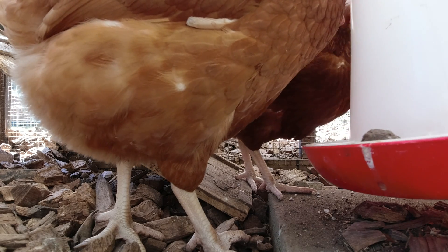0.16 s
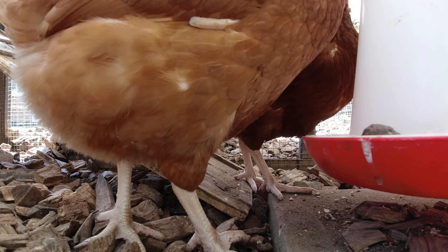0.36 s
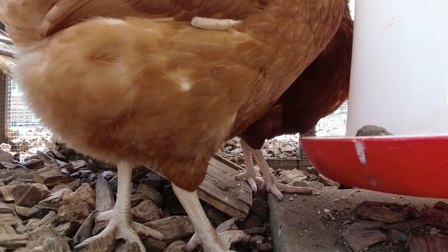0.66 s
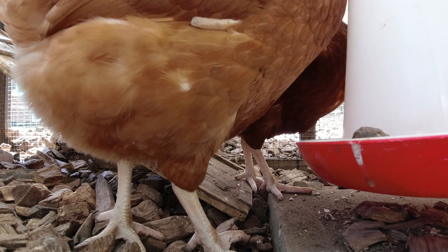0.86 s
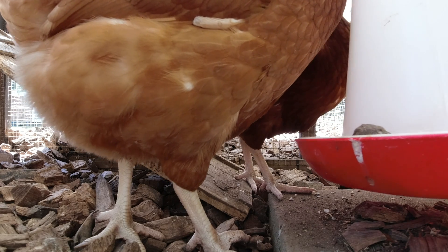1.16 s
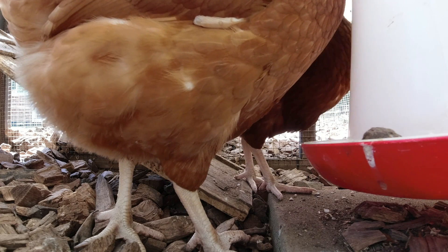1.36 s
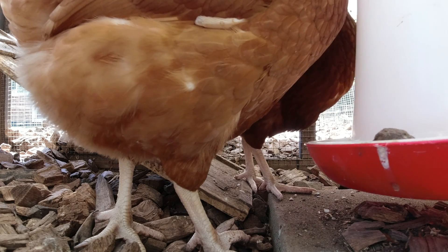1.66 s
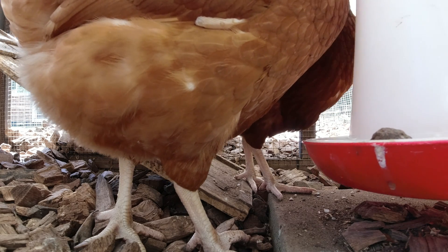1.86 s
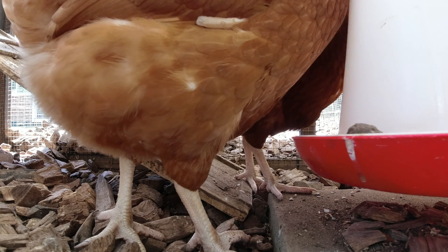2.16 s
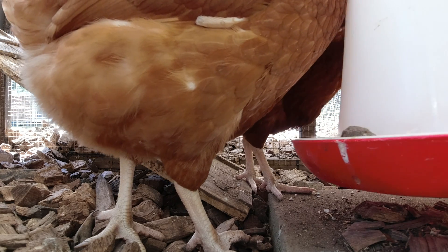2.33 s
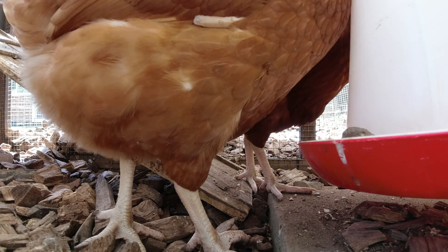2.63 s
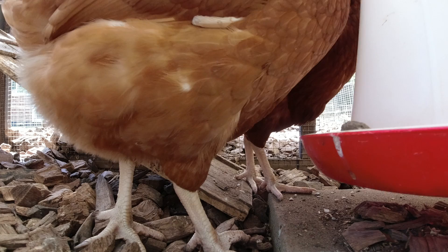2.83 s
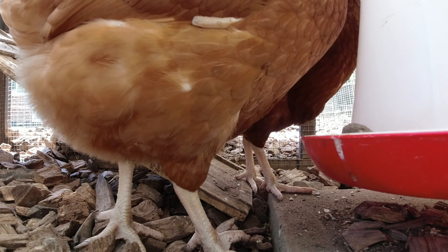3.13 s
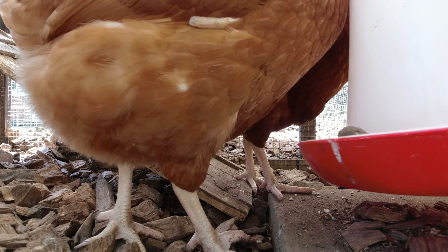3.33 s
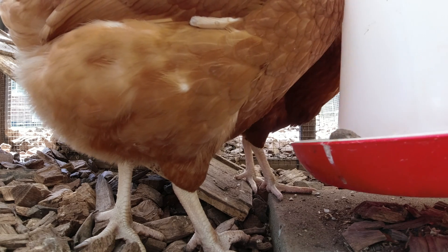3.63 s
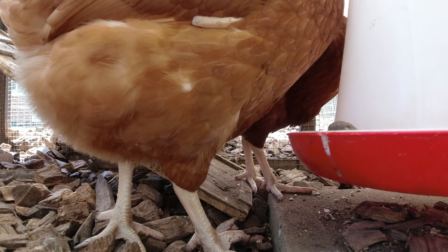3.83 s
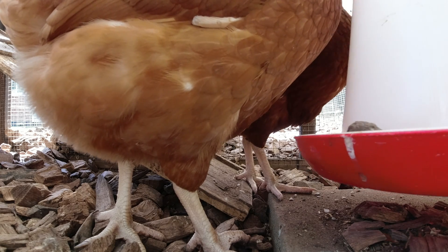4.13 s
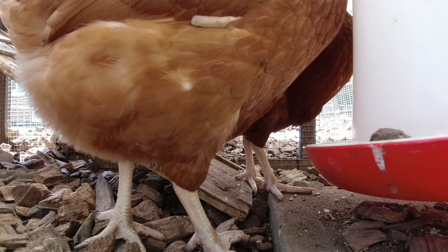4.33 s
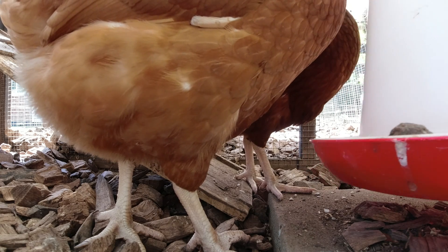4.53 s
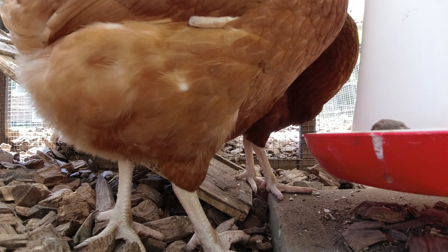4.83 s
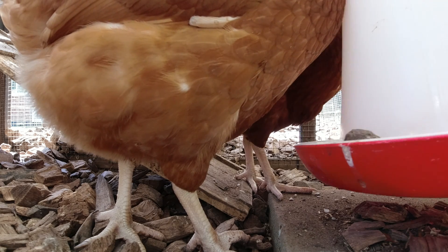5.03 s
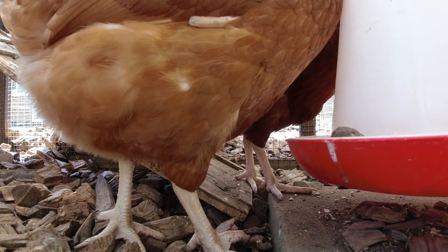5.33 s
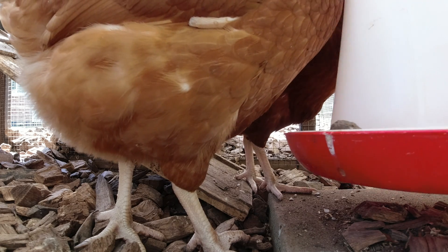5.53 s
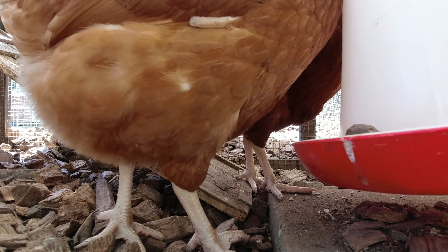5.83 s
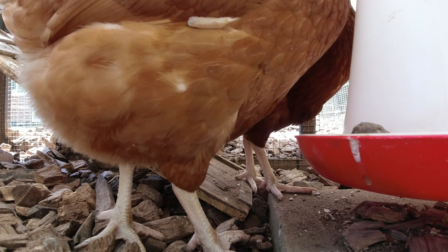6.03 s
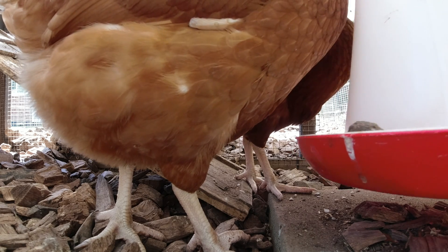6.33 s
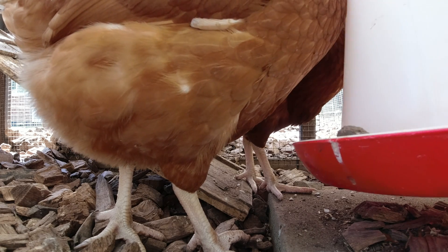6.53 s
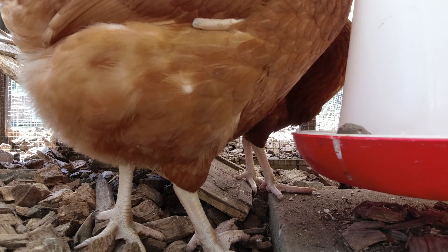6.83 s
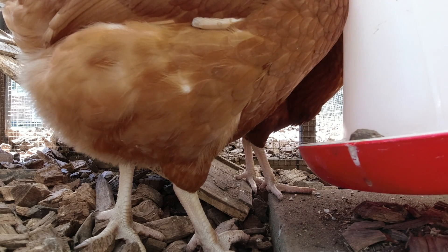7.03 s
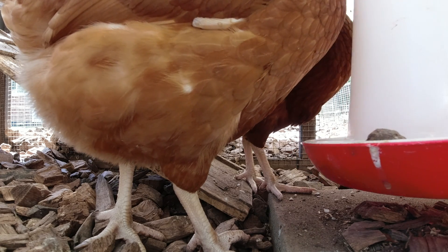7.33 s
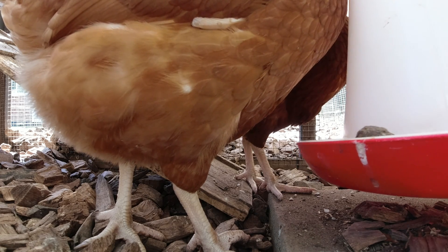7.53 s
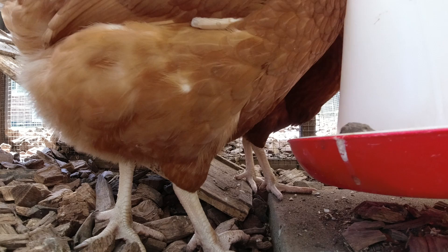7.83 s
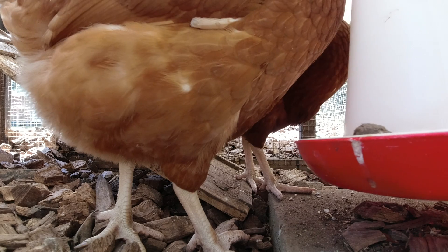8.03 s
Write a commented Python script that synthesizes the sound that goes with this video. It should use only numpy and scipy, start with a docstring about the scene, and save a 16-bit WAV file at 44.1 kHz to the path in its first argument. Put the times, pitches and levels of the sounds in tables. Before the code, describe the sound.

Uneven beak taps and hollow knocks on a plastic chicken feeder, with distant bird whistles and trills over a faint outdoor rumble.

```python
"""A low outdoor rumble, thin air and microphone hiss lay the bed; a songbird whistles further off.
At once hens start pecking feed from a hanging plastic pan: each blow thumps its hollow body, taps its
wall and sets it swaying. Dull bumps sit underneath. Faint cheeps come at 3 s, then whistles and trills
fill the second half, and a flurry of pecks closes the scene. The two microphone ports hear the bass
alike and the rest equally loud but turned in phase."""
import sys
import numpy as np
from scipy import signal
from scipy.fft import rfft, irfft, next_fast_len
from scipy.io import wavfile
from scipy.ndimage import uniform_filter1d

SR = 44100
rng = np.random.default_rng(int(sys.argv[2]) if len(sys.argv) > 2 else 0)


def master_out(mix):
    """Clip the mix to full scale and print it as 16-bit PCM to the path in sys.argv[1]."""
    frames = np.transpose(np.atleast_2d(mix))
    ceiling = np.clip(frames, -1, 1)
    pcm = np.round(ceiling * 32767).astype(np.int16)
    wavfile.write(sys.argv[1], SR, pcm)


N = 360297

# EQ curves of the noise beds: f/Hz, relative level/dB
RUMBLE_EQ = [(12, -25), (20, -1), (48, -3), (98, -3.5), (257, -3.5), (338, -11), (429, -22.5), (584, -37),
             (1200, -42), (1560, -64), (2640, -120)]
AIR_EQ = [(300, -34.5), (600, -7), (1000, -17.5), (1600, -6), (2050, 12.5), (2400, -3.5), (3500, -20),
          (6000, -29.5), (8000, -37)]
HISS_EQ = [(20, 12.5), (100, 6), (250, -8), (500, -5.5), (1500, -9), (4000, -16.5), (7100, -28.5),
           (8900, -26.5), (12500, -30.5), (13000, -42), (21000, -43.5)]
# fader ride of the rumble: t/s, level/dB
RUMBLE_RIDE = [(0.0, -49.5), (0.25, -52.5), (0.43, -61), (0.66, -62.5), (0.89, -53), (2.21, -61),
               (2.48, -56.5), (2.57, -56.5), (4.09, -61.5), (4.3, -55.5), (4.75, -59), (5.44, -58),
               (5.92, -61), (6.37, -59.5), (6.55, -61.5), (7.53, -61), (7.92, -52), (8.17, -50.5)]
# bird notes: start, loudest and end t/s, f/Hz at those three moments, level/dB, full trill swing/Hz
BIRD_NOTES = [(0, .02, 0.068, 2022, 1990, 1918, -52, 69), (0.092, .15, 0.19, 1960, 2063, 2190, -62.5, 90),
              (0.272, 0.358, 0.63, 2850, 2440, 2324, -74, 210),
              (1.095, 1.131, 1.2, 2510, 2605, 2460, -84.5, 30),
              (3.785, 3.86, 4.05, 2028, 2029, 1910, -56, 14.5),
              (3.841, 3.897, 4.09, 4550, 3860, 3830, -61.5, 520),
              (4.062, 4.095, 4.2, 2000, 2046, 2090, -63, 89),
              (4.139, 4.181, 4.29, 2800, 2830, 2800, -74, 150),
              (4.176, 4.192, 4.18, 4190, 3940, 3600, -62.5, 23),
              (4.23, 4.254, 5.2, 1980, 2065, 1980, -72.5, 52),
              (4.303, 4.318, 4.3, 4490, 4400, 4600, -69, 180),
              (4.365, 4.385, 4.49, 1970, 1964, 2030, -61, 30),
              (4.374, 4.42, 4.45, 3630, 3820, 3900, -60.5, 400),
              (4.494, 4.525, 4.57, 5120, 5120, 4950, -76, 120),
              (4.531, 4.574, 4.74, 4660, 4457, 4370, -73, 300),
              (4.713, 4.74, 4.76, 2430, 2380, 2330, -66.5, 25),
              (4.752, 4.778, 4.9, 2244, 2062, 1890, -52.5, 82),
              (4.827, 4.841, 4.89, 4095, 3970, 3220, -58.5, 60),
              (4.838, 4.994, 5.12, 2025, 2140, 2260, -55.5, 150),
              (5.083, 5.14, 5.14, 3962, 4400, 4700, -76.5, 550),
              (5.498, 5.554, 5.72, 2184, 1988, 2020, -51.5, 80),
              (5.687, 5.73, 5.8, 2560, 2456, 2390, -69, 240),
              (5.731, 5.807, 5.87, 2077, 1987, 2074, -50.5, 220),
              (5.828, 5.914, 5.96, 1950, 2042, 1904, -47, 110),
              (5.98, 6.05, 6.1, 1980, 2030, 2000, -62, 60),
              (5.991, 6.075, 6.26, 2990, 3117, 3050, -72.5, 240),
              (6.412, 6.435, 6.5, 3300, 3335, 3445, -86.5, 1200),
              (6.573, 6.609, 6.67, 1990, 2029, 2080, -71, 60),
              (6.57, 6.62, 6.6, 2450, 2530, 2497, -80.5, 200), (6.848, 6.9, 7.1, 2044, 1987, 2085, -64, 80),
              (7.085, 7.122, 7.18, 2560, 2626, 2475, -74.5, 120),
              (7.142, 7.27, 7.34, 2466, 2502, 2480, -61, 40)]
# blows on the pan: t/s, thump level/dB, thump tilt/(dB per octave), shell knock level/dB,
# wall tap level/dB, hardness (rim over wall)/dB
PECK_HITS = [(.051, -24.5, 7, -32, -35.5, -18), (.06, -13, 0, -39, -42, -36.5),
             (.08, -51, 11, -41.5, -44, -19), (0.242, -38.5, -14, -68, -71, -16.5),
             (.349, -12.5, -2.5, -28.5, -36, -28), (0.374, -55.5, 9, -48, -58, -11.5),
             (0.671, -14, 3.5, -30.5, -36.5, -15.5), (0.842, -17.5, 1, -39.5, -43.5, -20),
             (0.867, -46.5, 5, -53, -62, -27), (.985, -18.5, 11.5, -38, -43, -22),
             (1.007, -25, -6.5, -48, -51.5, -19), (1.202, -21, -2, -33.5, -37.5, -14.5),
             (1.268, -15.5, 4.5, -37.5, -36.5, -20), (1.302, -30.5, -7, -51, -55, -19),
             (1.375, -35, 4.5, -45.5, -39, -21.5), (1.421, -41, -14, -71, -74, -19),
             (1.579, -15, 4.5, -32, -35.5, -17.5), (1.598, -21, -6.5, -42, -45.5, -23),
             (1.649, -33.5, -5.5, -67, -66.5, -33.5), (1.899, -13, 2, -37, -46, -37),
             (1.926, -33, -10.5, -52, -51, -38), (2.277, -13.5, 0, -45.5, -45, -23.5),
             (2.303, -28.5, -1.5, -47.5, -43.5, -32), (2.465, -20.5, -2, -51, -43.5, -40.5),
             (2.501, -28.5, -2, -40, -41.5, -14), (2.564, -12.5, 3.5, -34.5, -37, -19),
             (2.588, -25, -8, -51, -55, -22), (2.782, -39, 10, -51, -59.5, -20.5),
             (2.795, -31.5, 6, -38, -36, -8.5), (2.826, -16, 3, -31.5, -36.5, -18),
             (3.121, -12.5, -3, -37, -41.5, -22.5), (3.145, -24.5, -5.5, -44.5, -56, -17),
             (3.452, -37, 21, -47, -44, -12.5), (3.491, -44.5, -16, -58, -53, -11),
             (3.523, -23.5, -0.5, -41.5, -44, -12), (3.821, -15, -4.5, -35, -41, -15.5),
             (4.105, -12.5, 2.5, -48.5, -39.5, -18), (4.133, -38, -1.5, -46, -53.5, -15.5),
             (4.199, -40.5, -6.5, -52, -42, -22.5), (4.335, -14, -4, -30.5, -33.5, -22),
             (4.355, -52.5, -0.5, -55, -45.5, -27), (4.498, -18, -7.5, -40, -36.5, -24),
             (4.522, -21.5, 6, -41, -46.5, -12), (4.854, -26.5, 24, -46.5, -44.5, -17),
             (4.899, -27, -8, -47.5, -44.5, -11), (5.123, -36, -5.5, -56, -68.5, -7.5),
             (5.174, -11.5, -0.5, -43, -43, -17), (5.298, -39, -12, -70, -74, -20),
             (5.343, -45, 11.5, -79, -78, -15), (5.565, -32.5, -2.5, -46, -45.5, -19),
             (5.629, -20, 2, -41, -45, -34), (6.076, -20.5, -2.5, -41.5, -40.5, -11.5),
             (6.275, -44.5, 17.5, -69, -79, -16), (6.369, -20, -11, -37.5, -39.5, -10.5),
             (6.827, -29, -3.5, -47, -52, -25), (6.904, -25.5, -1, -40, -40, -37.5),
             (6.917, -15, 0, -41, -41, -21.5), (7.002, -46.5, 1.5, -53.5, -54.5, -10),
             (7.232, -15.5, 7.5, -35.5, -39, -33), (7.257, -26.5, -3.5, -48.5, -49, -36),
             (7.51, -26, -10, -32, -44, -11), (7.617, -41, -13.5, -72, -72, -20),
             (7.747, -20.5, -5.5, -32.5, -37, -25), (7.768, -27.5, 18, -44, -45, -17.5),
             (7.861, -37, 23, -36, -35.5, -7.5), (7.872, -24.5, -8.5, -41.5, -39.5, -6),
             (7.906, -56.5, 2, -64, -50.5, -27), (7.967, -19, 19, -34.5, -37.5, -19),
             (7.989, -45, -2.5, -47, -42.5, -13.5), (8.016, -18, -6.5, -42.5, -42.5, -26),
             (8.038, -27.5, -1.5, -42.5, -50.5, -36), (8.091, -44, -5, -80, -64, -21)]
# modes of pan and hopper, from low sway to bright beak click: f/Hz, relative level/dB, t60/s
SWAY_MODES = [(35.2, -9, 0.64), (52.4, -5.5, 0.24), (64, -4, 0.1), (91, -4.5, 0.11)]
BODY_MODES = [(140, -13, .09), (200, -18, .07), (262, -1, .075), (338, -1, .085), (410, -16, .06)]
SHELL_MODES = [(479.7, 1.5, 0.06), (561, -2, 0.057), (636.3, -1, 0.041), (729.6, -11.5, 0.038),
               (880, -13, 0.042)]
WALL_MODES = [(954, -13, 0.023), (1130, -8, 0.012), (1341, -5.5, 0.016), (1460, -15, 0.024),
              (1702, -7.5, 0.022), (1886, -10, 0.041), (2039, -4, 0.036), (2170, -7.5, 0.02),
              (2335, -9.5, 0.03), (2510, -9.5, 0.013), (2858, -21.5, 0.033), (3146, -12.5, 0.013)]
RIM_MODES = [(3280, -3, .014), (3480, 0, .016), (3850, -2, .016), (4150, -3, .014), (4550, -3, .016),
             (4900, -9, .014), (5200, -11, .014)]
BEAK_MODES = [(5300, -1, .012), (5750, -2, .008), (6190, 2, .01), (6800, 0, .008), (7500, -5, .007),
              (8100, -5, .007), (8560, -2, .008), (9020, -3, .009), (9600, -6, .008), (10200, -13, .007)]
# dull low bumps: t/s, level/dB, f/Hz
LOW_BUMPS = [(0.055, -33, 59.9), (0.224, -32, 39.76), (0.523, -37, 31.6), (0.782, -50, 53.8),
             (0.993, -44.5, 60.1), (1.257, -35, 52), (1.348, -38, 51.1), (1.56, -35.5, 32.3),
             (1.927, -50.5, 32.17), (2.262, -33, 71.8), (2.553, -35, 72.2), (2.992, -46.5, 51.7),
             (3.445, -48, 40.7), (4.089, -43, 72.7), (4.492, -36, 73), (4.838, -45, 51.1),
             (5.164, -38, 72.3), (5.574, -52.5, 43.7), (6.348, -44.5, 72), (6.9, -44.5, 72.7),
             (7.49, -41, 70.2)]
# far cheeps: t/s, level/dB
FAR_CHEEPS = [(3.0145, -82.5), (3.1467, -77.5), (3.243, -79), (3.3303, -90), (3.5633, -81), (3.6306, -91)]
# phase lead of the left microphone port over the right: f/Hz, phase/rad
PORT_PHASE = [(20, .1), (400, -.27), (1050, -2.6), (1400, -1.6), (1900, -2.8), (2250, -2.2), (2650, -6.7),
              (3000, -6.4), (3350, -8.6), (3900, -8.8), (4300, -10.8), (4600, -11), (5400, -13.6),
              (6200, -18.6), (10000, -33)]

AIR_DB, HISS_DB = -88.5, -73
NOTE_START_DB, NOTE_END_DB = 13.5, 21.5  # below the note's loudest moment
NOTE_HOLD = 2.6  # the larger, the longer a note stays near its loudest
TRILL_RATE_HZ, WAVER_HZ = 63, 30  # trill rate of a 2 kHz note; random pitch drift
SWAY_DB, SWAY_FROM_THUMP = -40.5, .21  # the pan swings a little more after a strong thump
HARD_FROM_DB, BEAK_DB, BEAK_RISE = -13, -41.5, 5.37  # the beak click comes up on the hardest blows
CRUNCH_S, SNAP_S, SNAP_S_PER_DB = .0077, .0035, .04  # on those the crunch tightens to a snap
SETTLE_DB, GRIT_DB, GRIT_BAND_HZ = -28, -23, (1200, 4200)
RUN_DB, RUN_T60_S, RUN_BAND_HZ = -8, .12, (975, 5000)
OVERLOAD, EDGE_HZ = .24, 20500  # amplitude where wave tops begin to flatten; band limit


def gain_of(db):
    """Decibels to a factor."""
    return 10 ** (np.asarray(db) / 20)


def unit_rms(x):
    """Scales to an rms of one."""
    return x / np.sqrt(np.mean(x ** 2) + 1e-20)


def add(mix, s, sound):
    """Mixes a sound in from second s on."""
    part = mix[max(round(s * SR), 0):][:len(sound)]
    part += sound[:len(part)]


def noise_bed(eq, patchy_db):
    """Coloured noise with patches that swell and fade across time and pitch; rms one."""
    frames, bin_hz = N // 256 + 5, np.fft.rfftfreq(1024, 1 / SR)
    real, imag, patches = rng.standard_normal((frames, 513, 3)).T
    patches = unit_rms(uniform_filter1d(uniform_filter1d(patches, size=10, axis=0), size=14, axis=1))
    hz, db = np.transpose(eq)
    colour_db = np.interp(np.log(bin_hz + 1), np.log(hz), db)[:, None]
    spectra = (real + 1j * imag) * gain_of(colour_db + patchy_db * patches)
    return unit_rms(signal.istft(spectra, nperseg=1024, noverlap=768)[1][:N])


def yard():
    """The outdoor bed: lumpy rumble on a slow fader ride, and a thin wash of distant air."""
    s, db = np.transpose(RUMBLE_RIDE)
    rumble = noise_bed(RUMBLE_EQ, patchy_db=2.5) * gain_of(np.interp(np.arange(N) / SR, s, db))
    return rumble + gain_of(AIR_DB) * noise_bed(AIR_EQ, patchy_db=2)


def microphone_hiss():
    """Each of the two microphones has its own steady noise floor."""
    return gain_of(HISS_DB) * np.array([noise_bed(HISS_EQ, patchy_db=.9) for _ in range(2)])


def songbirds():
    """Whistles that swell, bend and fade; pitch and level flutter together, faster on high notes."""
    out = np.zeros(N)
    for *moments, start_hz, top_hz, end_hz, top_db, swing_hz in BIRD_NOTES:
        start, top, end = moments
        t = np.arange(start, end, 1 / SR)
        drop_db = np.where(t < top, NOTE_START_DB, NOTE_END_DB)
        db = top_db - drop_db * np.interp(t, moments, [1, 0, 1]) ** NOTE_HOLD
        hz = np.interp(t, moments, [start_hz, top_hz, end_hz])
        hz += WAVER_HZ * unit_rms(uniform_filter1d(rng.standard_normal(len(t)), size=300))
        swing = swing_hz * np.interp(t, moments, [.4, 1, 1])  # the trill opens as the note swells
        jitter = 1 + .7 * uniform_filter1d(rng.standard_normal(len(t)), size=600)
        rate = TRILL_RATE_HZ * (top_hz / 2000) ** .55 * jitter
        trill = 2 * np.pi * (np.cumsum(rate) / SR + rng.random())
        tone = np.sin(2 * np.pi * np.cumsum(hz + swing / 2 * np.sin(trill)) / SR)
        throb = 1 + np.clip(swing / 650, 0, .95) * np.cos(trill)  # loudest on each upward sweep
        add(out, start, np.sqrt(2) * gain_of(db) * throb * tone * signal.windows.tukey(len(t), .12))
    return out


def with_yard_echoes(song, t60=.4, wet_db=-5, predelay_s=.006):
    """Sparse reflections off the yard blur the song and set it back."""
    t = np.arange(SR // 3) / SR
    reflections = rng.choice([-1., 1.], len(t)) * (rng.random(len(t)) < .045)
    tail = reflections * gain_of(-60 * t / t60) * (t > predelay_s)
    return song + gain_of(wet_db) * signal.oaconvolve(song, tail / np.linalg.norm(tail))[:N]


def feed_rattle(db, t60, per_s, size):
    """The small uneven knocks of feed settling after a blow."""
    knocks = rng.standard_normal(size) * gain_of(2.7 * np.minimum(rng.exponential(1, size), 3))
    return knocks * (rng.random(size) < per_s / SR) * gain_of(db - 60 * np.arange(size) / SR / t60)


def blow(rattle, contact_ms):
    """The force of one hit and the rattle behind it; a longer contact makes both duller."""
    force = np.append(1, rattle[1:])
    return np.convolve(force, np.hanning(round(contact_ms * SR / 1000) + 3))[:len(rattle)]


def ring(modes, force, rise_ms, spread_db, tilt_db=0):
    """The force rings the modes, each a little changed by where the blow lands; the attack peaks at one."""
    hz, db, t60 = np.transpose(modes)[:, :, None]
    t = np.arange(0, t60.max(), 1 / SR)
    level_scatter, detune = rng.standard_normal((2, len(modes), 1))
    db = db + tilt_db * np.log2(hz / 300) + spread_db * level_scatter
    sign = (-1.) ** np.arange(len(modes))[:, None]  # neighbours start in opposite directions
    partials = sign * gain_of(db - 60 * t / t60) * np.sin(2 * np.pi * hz * (1 + .025 * detune) * t)
    attack = (1 - np.exp(-t * 1000 / rise_ms)) ** 2  # the shell takes a moment to carry the blow
    out = signal.fftconvolve(force, partials.sum(0) * attack)[:len(force)]
    return out / abs(out[:SR // 40]).max()


def beak_tap(lead_s, hard_db):
    """The top of a peck: crunching feed is heard as grit and rings the wall, rim and beak."""
    t = np.arange(5000) / SR
    over_db = max(hard_db - HARD_FROM_DB, 0)
    width_s = max(CRUNCH_S - SNAP_S_PER_DB * over_db, SNAP_S)
    envelope = .32 * (1 - np.exp(-t / .00072)) * np.exp(-((t - lead_s) / width_s) ** 2)
    crunch = rng.standard_normal(len(t)) * envelope
    scatter = feed_rattle(-12 - .58 * over_db, t60=.15, per_s=2500, size=len(t))
    crunch += scatter * (1 - np.exp(-t / .0044))
    grit = signal.sosfilt(signal.butter(4, GRIT_BAND_HZ, "band", fs=SR, output="sos"), crunch)
    tap = gain_of(GRIT_DB + .28 * (hard_db + 20)) * grit / abs(grit).max()
    for modes, db in ((WALL_MODES, 0), (RIM_MODES, hard_db), (BEAK_MODES, BEAK_DB + BEAK_RISE * over_db)):
        tap += gain_of(db) * ring(modes, crunch, rise_ms=.54, spread_db=1.5)
    return tap


def pecks():
    """Each blow stacks four layers: hollow body thump, shell knock, the pan's low sway, a crisp tap."""
    out = np.zeros(N)
    for s, thump_db, tilt_db, knock_db, tap_db, hard_db in PECK_HITS:
        # the tap and knock start a few milliseconds ahead of the thump; the lead is set from the thump level
        lead_s = np.interp(thump_db, [-25, -17], [.0015, .0065])
        settling = feed_rattle(SETTLE_DB, t60=.2, per_s=720, size=12000)
        thump = ring(BODY_MODES, blow(settling, contact_ms=1.4),
                     rise_ms=2.47, spread_db=3.14, tilt_db=tilt_db)
        knock = ring(SHELL_MODES, blow(settling, contact_ms=.9), rise_ms=1.6, spread_db=6.2)
        slow_settling = feed_rattle(-18, t60=.32, per_s=600, size=10000)
        sway = ring(SWAY_MODES, blow(slow_settling, contact_ms=4.2), rise_ms=.62, spread_db=1.7)
        add(out, s - .0028, gain_of(thump_db) * thump)
        add(out, s - lead_s, gain_of(knock_db) * knock)
        add(out, s, gain_of(SWAY_DB + SWAY_FROM_THUMP * thump_db) * sway)
        add(out, s - lead_s, gain_of(tap_db) * beak_tap(lead_s, hard_db))
    return out


def run_echoes(pecking):
    """The hen run scatters the upper mids into a short tail, different at each port."""
    t = np.arange(SR // 4) / SR
    tail = rng.standard_normal((2, len(t))) * gain_of(-60 * t / RUN_T60_S)
    send = signal.sosfilt(signal.butter(4, RUN_BAND_HZ, "band", fs=SR, output="sos"), pecking)
    return gain_of(RUN_DB) * signal.oaconvolve(send[None], tail / np.linalg.norm(tail[0]), axes=1)[:, :N]


def bumps(cycles=1.9):
    """Dull bass bumps, each a short, soft swing back and forth."""
    out = np.zeros(N)
    for s, db, hz in LOW_BUMPS:
        t = np.arange(0, cycles / hz, 1 / SR)
        add(out, s, gain_of(db) * np.hanning(len(t)) * np.sin(2 * np.pi * hz * t))
    return out


def cheeps(hz=4950, length_s=.019):
    """Far cheeps: tiny soft-edged pips on one pitch."""
    out, t = np.zeros(N), np.arange(round(length_s * SR)) / SR
    for s, db in FAR_CHEEPS:
        add(out, s, gain_of(db) * np.hanning(len(t)) * np.sin(2 * np.pi * hz * t))
    return out


def scene():
    """One mono mix, turned in opposite phase directions at the two ports, plus the echoes of the run."""
    pecking = pecks()
    birds = with_yard_echoes(songbirds() + cheeps())
    mono = (pecking + birds + bumps() + yard()) * signal.windows.tukey(N, .002)
    size = next_fast_len(N + 4096)
    hz, phase = np.transpose(PORT_PHASE)
    half_turn = np.interp(np.fft.rfftfreq(size, 1 / SR), hz, phase) / 2
    ports = rfft(mono, size) * np.exp(1j * np.array([half_turn, -half_turn]))
    return irfft(ports, size)[:, :N] + run_echoes(pecking)


def record(dry):
    """The loudest wave tops flatten a little, the hiss joins, and a low-pass trims the very top."""
    excess = np.maximum(abs(dry) - OVERLOAD, 0)
    flattened = dry - .1 * np.sign(dry) * excess
    lowpass = signal.firwin(511, EDGE_HZ, window=("kaiser", 9), fs=SR)
    return signal.oaconvolve(flattened + microphone_hiss(), lowpass[None], "same")


dry = scene()
out = record(dry)
master_out(out)
```